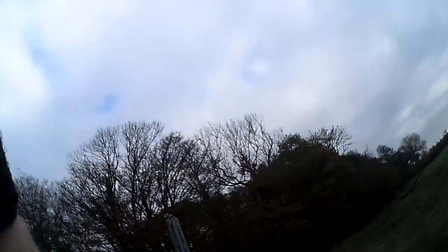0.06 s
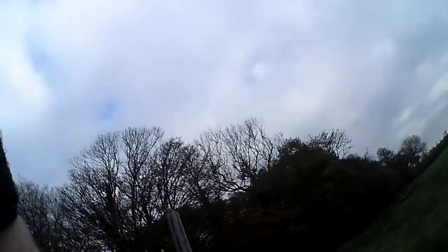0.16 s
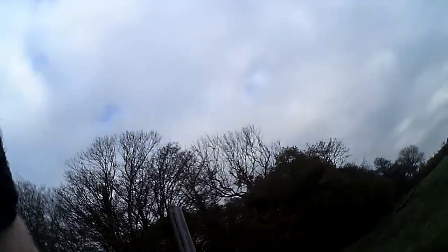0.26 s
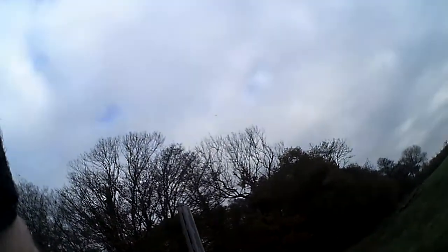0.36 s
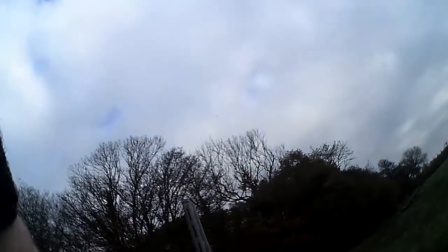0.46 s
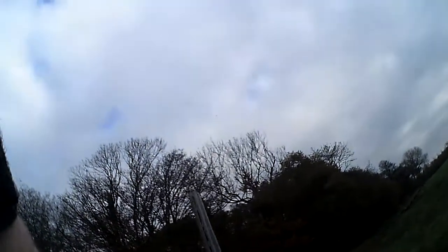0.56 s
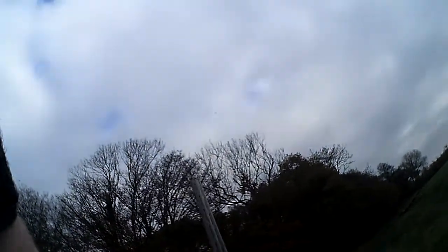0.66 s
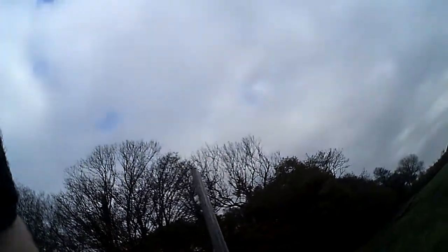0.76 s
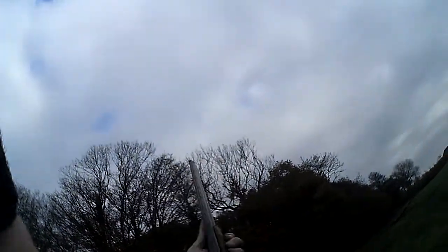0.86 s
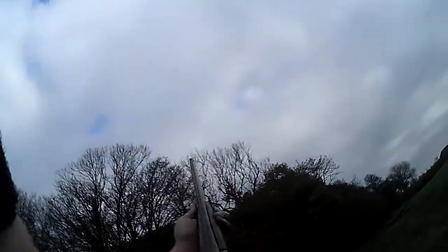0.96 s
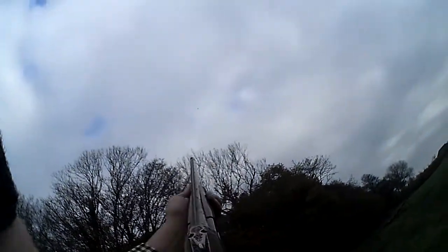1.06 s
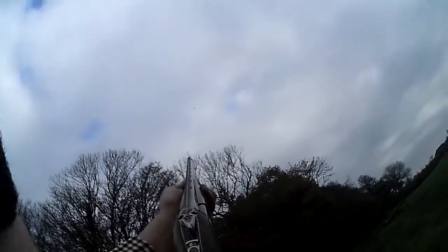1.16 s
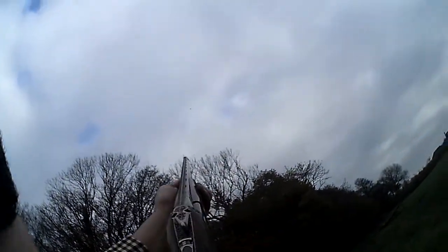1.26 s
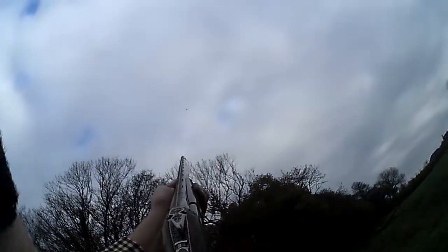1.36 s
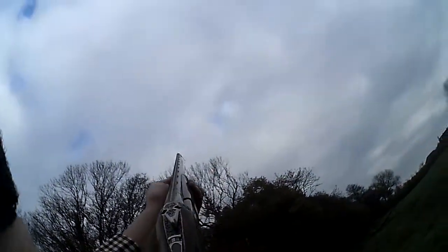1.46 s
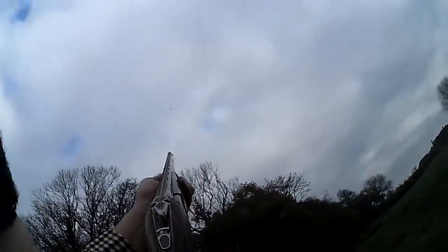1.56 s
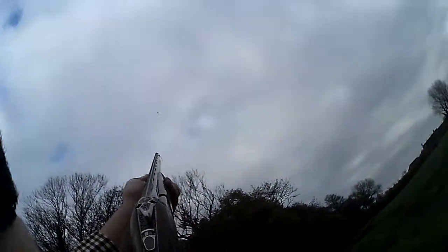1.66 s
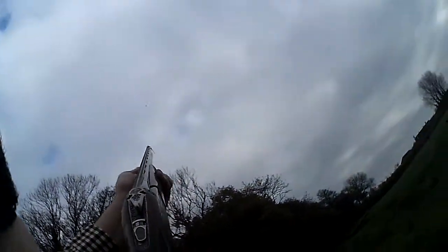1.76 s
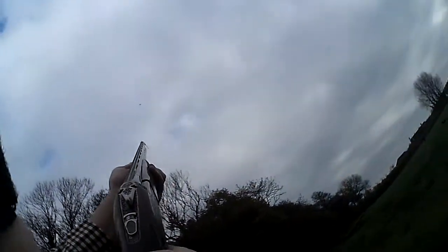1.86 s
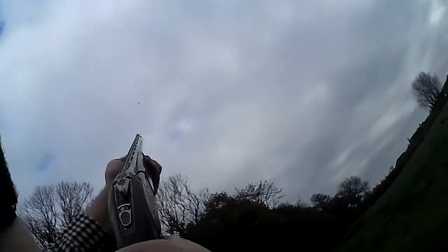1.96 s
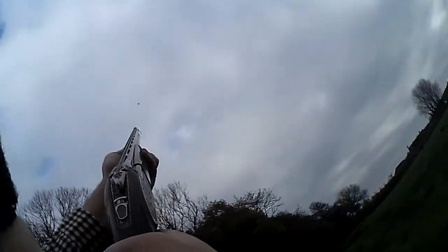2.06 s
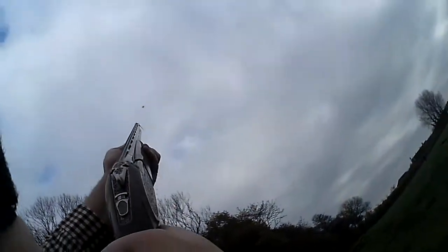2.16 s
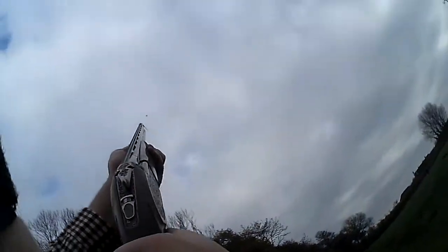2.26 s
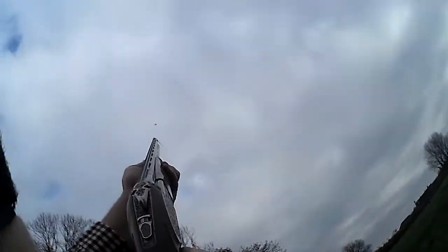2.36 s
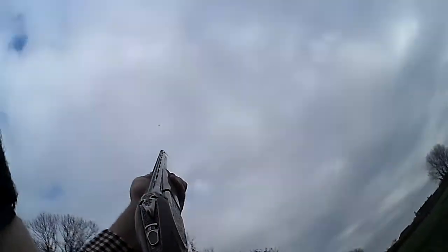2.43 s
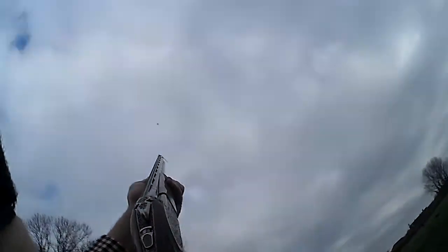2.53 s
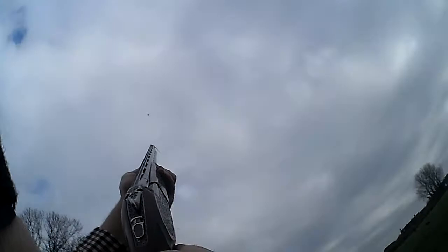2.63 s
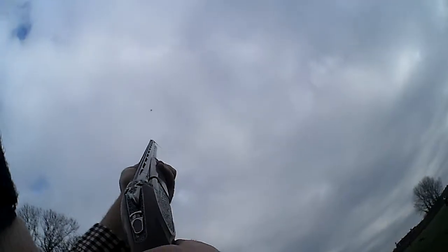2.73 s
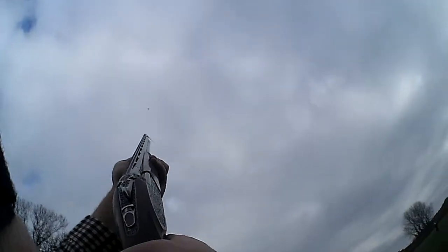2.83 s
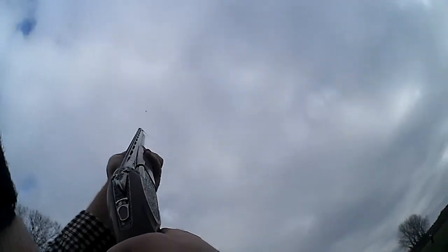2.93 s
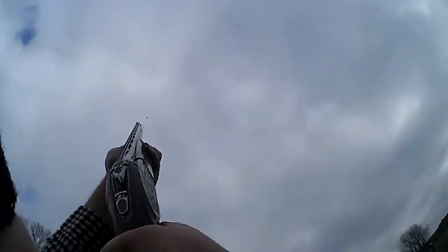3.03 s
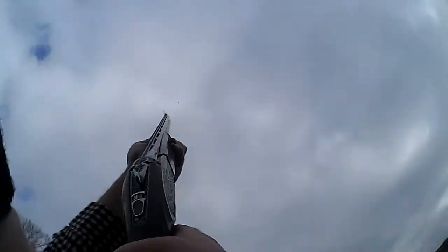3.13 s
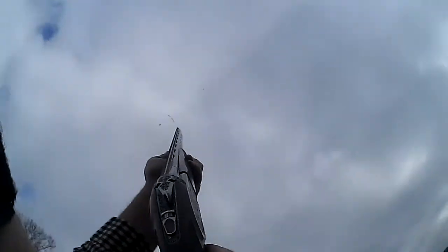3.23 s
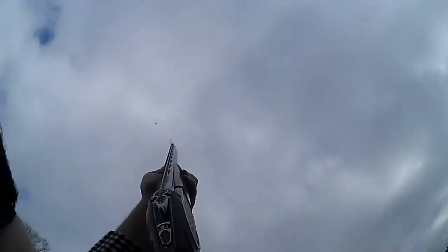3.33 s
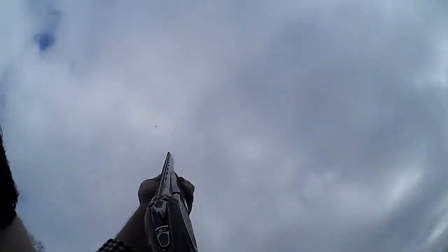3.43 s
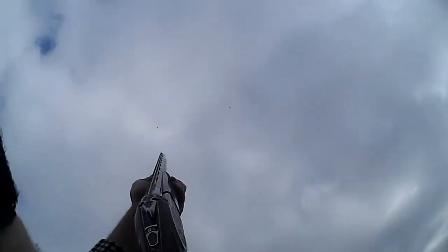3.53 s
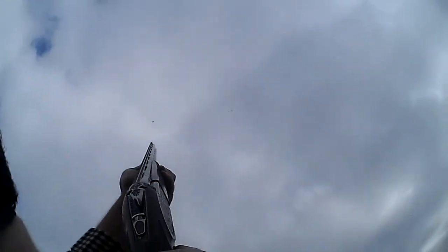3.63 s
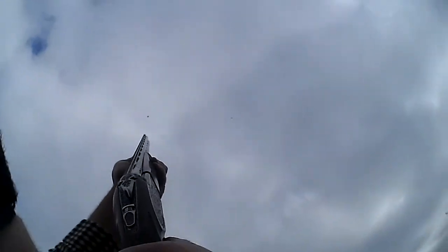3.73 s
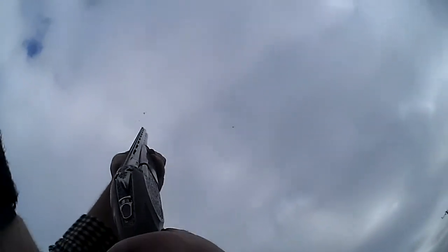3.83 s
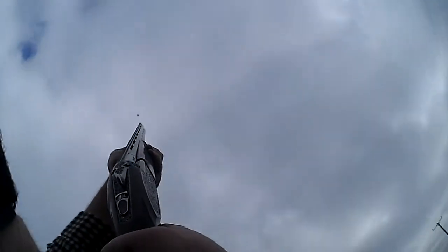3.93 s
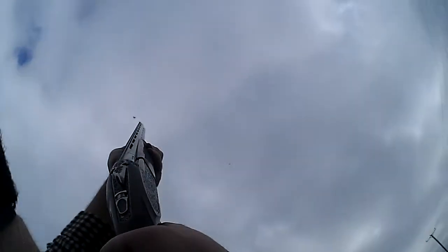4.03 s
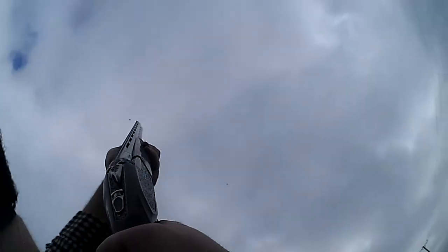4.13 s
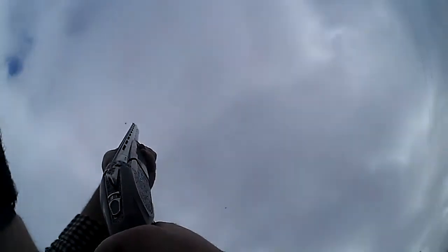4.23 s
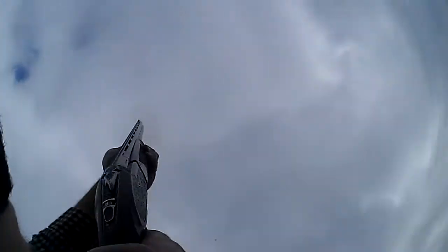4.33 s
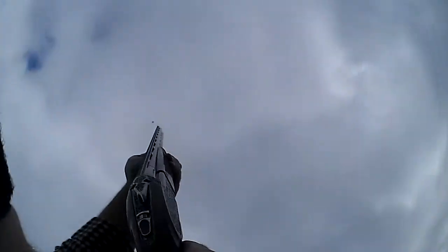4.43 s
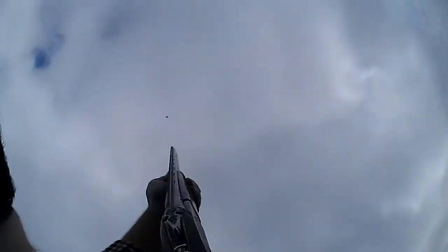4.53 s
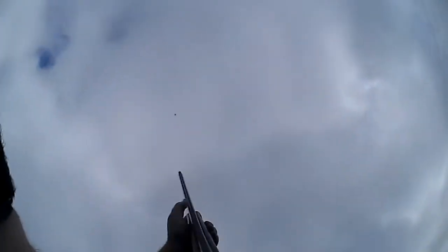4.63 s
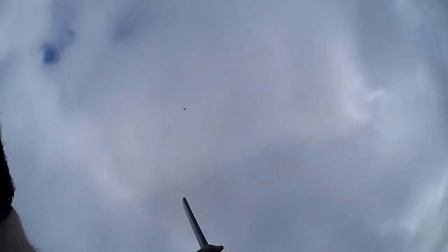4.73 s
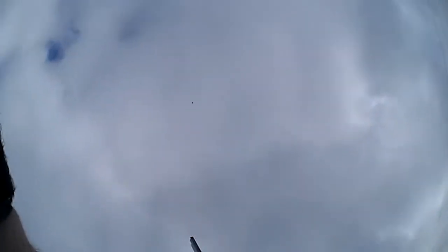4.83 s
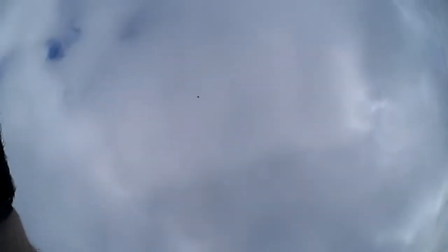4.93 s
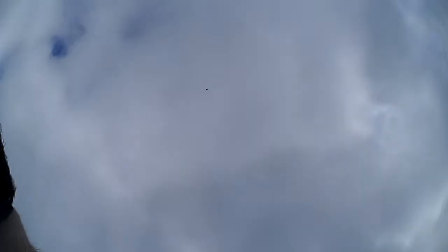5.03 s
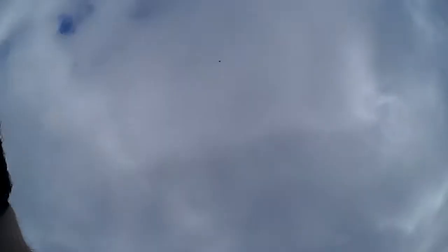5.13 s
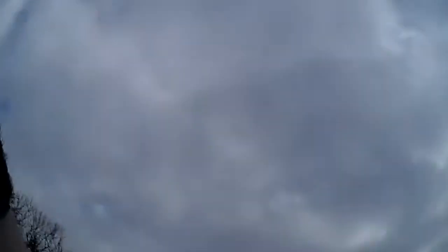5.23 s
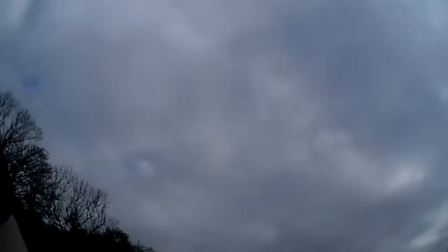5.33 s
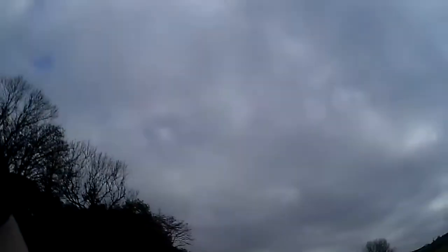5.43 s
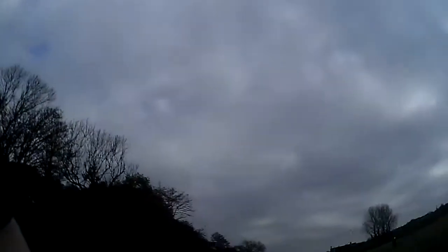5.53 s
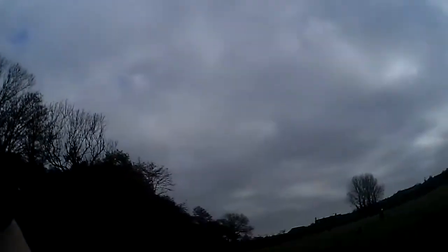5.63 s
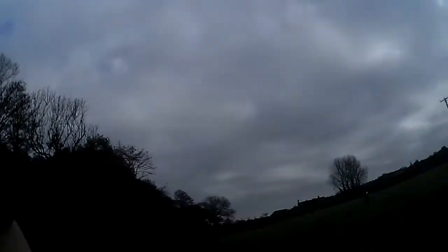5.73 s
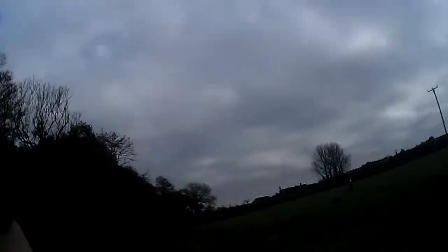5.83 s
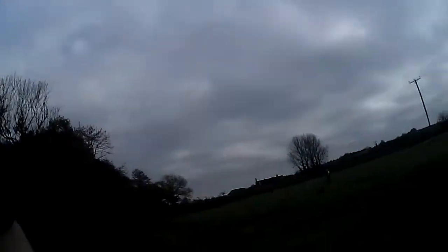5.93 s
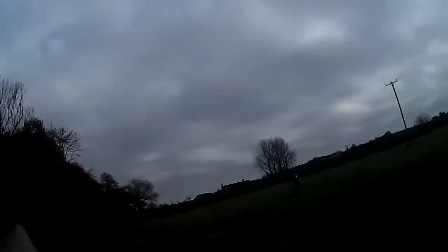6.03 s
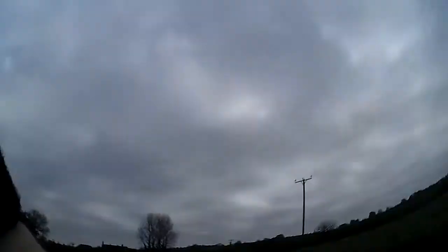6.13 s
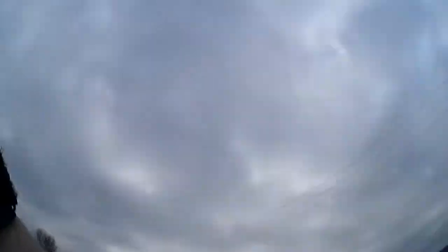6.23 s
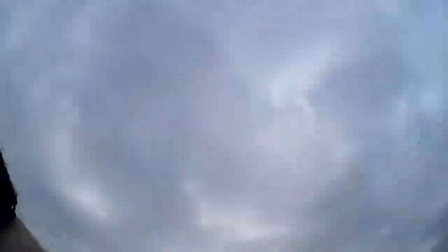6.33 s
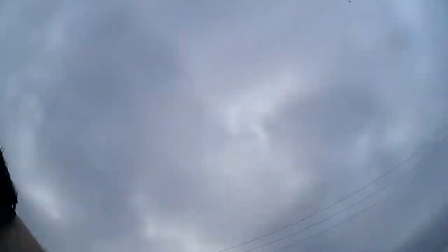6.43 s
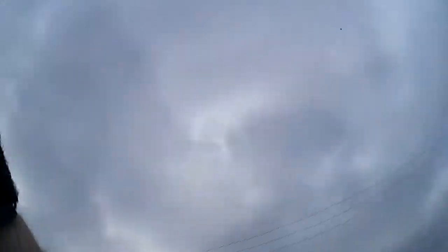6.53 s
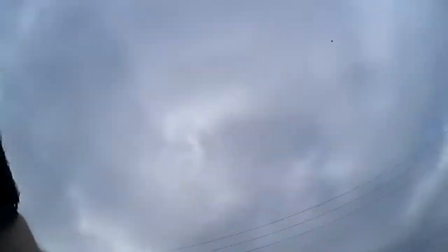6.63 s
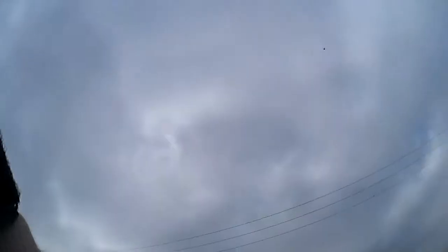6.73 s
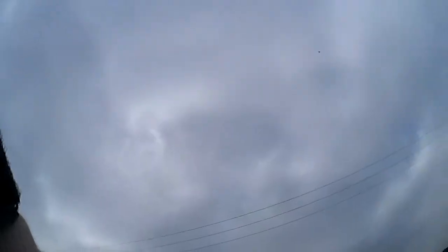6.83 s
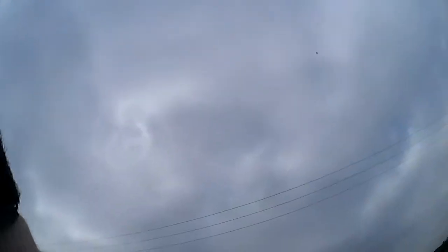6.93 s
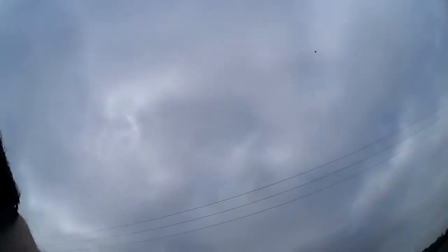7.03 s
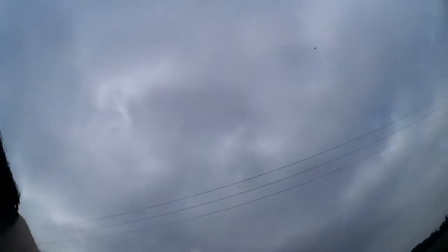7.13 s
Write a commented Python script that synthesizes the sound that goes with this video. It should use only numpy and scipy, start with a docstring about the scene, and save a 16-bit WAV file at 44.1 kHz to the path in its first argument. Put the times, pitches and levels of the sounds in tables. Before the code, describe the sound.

Four shotgun shots in an open field, two from a nearby gun then two louder close ones, echoing off trees, ending with small metallic clicks.

```python
"""A field beside a wood, heard through a camera's cased microphone worn by one of two shooters.
A neighbouring gun fires twice, then the wearer's own gun twice: shock fronts, gas noise and ground bounces.
Scattered taps throw each report back from the trees, and single reflectors add thin copies.
The case rings and the microphone overloads. Banded noise and steel modes click just after each of the
wearer's shots and again later, as the gun is opened; soft rustles of clothing and steady hiss lie beneath."""
import sys
import numpy as np
from scipy import signal
from scipy.fft import rfft, irfft
from scipy.io import wavfile
from scipy.ndimage import uniform_filter1d

SR = 44100
rng = np.random.default_rng(int(sys.argv[2]) if len(sys.argv) > 2 else 0)


def store_pcm(level_fs):
    """Save levels as 16-bit WAV."""
    pcm = np.round(np.clip(level_fs, -1, 1) * 32767).astype(np.int16)
    wavfile.write(sys.argv[1], SR, np.atleast_2d(pcm).T)


N = 316544


def own_gun(blast_ms=0.058, front_hz=5000, jolt_db=7, jolt_ms=0.57, lock_db=-9, lock_t60=0.062, lock_hz=4500,
            gas_db=-18, gas_s=.005, gas_hz=11000, push_db=0, push_hz=178, push_t60=.055,
            bounce_db=15.5, bounce_ms=0.19, grass_hz=3200, spread_db=-12, spread_t60=0.011, clatter_db=0,
            far_ms=.18, twig_db=-43, woods_delay=0.078, woods_t60=1.15, reflectors_db=-4):
    """Hammer and ignition jolt the gun; the muzzle blast follows, then its bounce off the ground and the recoil."""
    # the wearer's shots: start_s (muzzle blast), blast_db, echo_db
    shots = [(3.0550, 29, 4), (4.2514, 26, 1.5)]
    # trunks, hedges and far buildings around this spot:
    # delay_s, size_db (before path loss), depth_t60_s, blast_length_ms
    reflectors = [(.128, 4.5, 0.051, 0.67), (.205, 1.5, 0.032, 0.75), (.371, -1, .04, 0.69),
                  (.471, -3.5, 0.034, 0.32), (.813, 3.5, 0.019, 0.37), (.876, 6, .9, .25)]
    # clatter of recoil and nearby ground: frequency_hz, level_db
    clatter_colour = [(25, 3.5), (70, -10.5), (200, -4), (360, 5.5), (650, -2.5), (1200, 2.5), (1900, -2.5),
                      (2700, 0), (4000, -6.5), (8000, -4.5), (11500, -3), (15000, -7.5)]
    # how long each band of the clatter lasts: frequency_hz, t60_s
    clatter_t60s = [(30, 0.24), (150, 0.065), (500, 0.15), (2000, 0.11), (6000, 0.13), (12000, 0.056)]
    lock_s = .0056  # from the hammer's fall to the muzzle blast
    ground_s = .01  # from the muzzle blast to its bounce off the ground

    out = np.zeros(N)
    t = np.arange(SR // 4) / SR
    push = np.sin(2 * np.pi * push_hz * t) * decay(t, push_t60)
    for s, db, echo_db in shots:
        add(out, s - lock_s, amp(jolt_db) * dulled(blast(jolt_ms), lock_hz))
        add(out, s - lock_s, amp(lock_db) * dulled(burst(lock_t60), lock_hz))

        add(out, s, amp(db) * dulled(blast(blast_ms), front_hz))
        add(out, s, amp(db + gas_db) * dulled(jet(gas_s), gas_hz))
        add(out, s, amp(push_db) * push)  # the stock thumps the shoulder

        bounce = amp(spread_db) * smeared(burst(spread_t60), bounce_ms)  # rough ground
        add(bounce, 0, blast(bounce_ms))
        add(out, s + ground_s, amp(bounce_db) * dulled(bounce, grass_hz))
        clatter = dying(rng.standard_normal(SR // 2), clatter_colour, clatter_t60s)
        add(out, s + ground_s, amp(clatter_db) * clatter)

        add(out, s, amp(echo_db) * woods(blast(far_ms), woods_delay, woods_t60))
        add(out, s, amp(twig_db) * twigs())
        add(out, s, amp(echo_db + reflectors_db) * single_echoes(reflectors))
    return out


def neighbour_gun(blast_db=15.0, bounce_lag_ms=1.55, bounce_db=3.5, near_db=-27, near_t60=0.19,
                  gas_db=-12, gas_s=0.0046, front_hz=7000, far_ms=.26, far_bounce=.85,
                  twig_db=-56, woods_delay=.07, woods_t60=1.3):
    """The blast and its ground bounce arrive almost together, which hollows both the report and its echo."""
    # the neighbour's shots: start_s, blast_length_ms, echo_db
    shots = [(1.8967, 0.4, 9.5), (2.7446, .18, 7.5)]
    # trunks, hedges and far buildings around that spot:
    # delay_s, size_db (before path loss), depth_t60_s, blast_length_ms
    reflectors = [(.0815, 7.5, 0.077, 0.45), (.101, -5.5, .05, 0.11), (.134, -1, .02, 0.31),
                  (.228, 1.5, .035, 0.51), (.43, -1, .035, .45), (.601, -5.5, 0.035, 0.28)]
    # the wearer's body shades and reinforces a blast from the side: frequency_hz, level_db
    sideways = [(150, 1.5), (400, -4.5), (750, 6.5), (1100, 3.5), (1800, -3), (2500, 0.5), (3200, 6),
                (4300, -5.5), (9000, 0), (15000, -7.5)]

    direct, echo = np.zeros((2, N))
    lag = bounce_lag_ms / 1000
    for s, ms, echo_db in shots:
        front = dulled(blast(ms), front_hz)
        add(direct, s, amp(blast_db) * front)
        add(direct, s + lag, amp(blast_db + bounce_db) * front)
        add(direct, s + lag, amp(gas_db) * jet(gas_s))
        add(echo, s, amp(near_db) * smeared(burst(near_t60), ms))  # grass nearby

        report = blast(far_ms)
        add(report, lag, far_bounce * blast(far_ms))
        report = report / (1 + far_bounce)
        add(echo, s, amp(echo_db) * woods(report, woods_delay, woods_t60))
        add(echo, s, amp(echo_db + twig_db) * twigs())
        add(echo, s, single_echoes(reflectors))
    return coloured(direct, sideways) + echo


def blast(ms, size=1024):
    """A shock front, then suction; the impulse is the same for every length."""
    u = np.arange(size) * 1000 / SR / ms
    return np.diff(u * np.exp(-u), prepend=0) * SR / 4000


def jet(length_s, low_hz=160, size=2048):
    """Turbulent gas roars evenly while the barrel empties, then stops."""
    u = np.arange(size) / SR / length_s
    roar = shaped(rng.standard_normal(size), lambda hz: hz / np.hypot(hz, low_hz))
    return roar * np.exp(-u ** 4)


def woods(report, delay, t60, early_db=-17, rise_s=0.018):
    """Countless twigs and trunks scatter a report; only a little returns before it reaches the tree line."""
    # colour of the echo from the trees: frequency_hz, level_db
    tree_colour = [(60, 1), (200, -1), (340, 5), (600, -2), (1000, -10.5), (1300, 1), (1900, -6.5),
                   (3000, -6.5), (4000, -3.5), (6000, -2), (9000, -9), (15000, -18)]
    # air takes the treble first: frequency_hz, t60_factor
    air_loss = [(100, 0.72), (500, 1.183), (2000, 0.87), (4000, 0.44), (9000, 0.37)]
    t = np.arange(2 * SR) / SR
    lumps = unit(uniform_filter1d(rng.standard_normal(len(t)), size=600))
    clumps = amp(2.3 * np.clip(lumps, -2.5, 1.5))  # trees stand in groups
    trunks = amp(2.5 * np.minimum(rng.exponential(1, len(t)), 6))  # a few reflectors are large
    reach = amp(early_db) + (1 + np.tanh((t - delay) / rise_s)) / 2
    taps = rng.choice([-1, 1], len(t)) * trunks * clumps * reach
    taps /= np.linalg.norm(taps * decay(t, t60))  # sets the energy the taps have once they decay
    return signal.fftconvolve(dying(taps, tree_colour, air_loss, t60), report)


def twigs(peak_s=0.13, spread=0.45, centre_hz=4500, octaves=0.5):
    """Bare twigs return only the treble of a blast, as a hiss that swells and fades."""
    t = np.arange(1, SR + 1) / SR
    swell = np.exp(-(np.log(t / peak_s) / spread) ** 2 / 2)
    return band_noise(SR, centre_hz, octaves) * swell


def single_echoes(reflectors, smear_db=-18, low_hz=150, high_hz=2400, path_loss_db_per_s=34.5):
    """Large reflectors return dull, thin blasts: fainter with travel time, smeared longer the deeper they are."""
    out = np.zeros(2 * SR)
    for delay, size_db, depth_t60, ms in reflectors:
        face = amp(smear_db) * burst(depth_t60)
        face[0] += 1  # the clean copy ahead of the smear
        db = size_db - path_loss_db_per_s * delay
        add(out, delay, amp(db) * np.convolve(face / np.linalg.norm(face), blast(ms)))
    return shaped(out, lambda hz: hz / np.hypot(hz, low_hz) / (1 + (hz / high_hz) ** 4))


def action():
    """Steel parts scrape and snap home, and ring briefly."""
    # clicks of the gun's action: start_s, level_db, t60_s, centre_hz, width_octaves, ring_db
    clicks = [(3.0895, -10.5, 0.0056, 11970, 0.42, -53.5), (4.322, -16.5, 0.033, 6530, 1.3, -60),
              (5.0598, -41.5, .012, 1900, .4, -67.5), (5.5227, -34.5, 0.017, 1900, 0.68, -60),
              (5.548, -42, 0.03, 1690, .8, -67), (5.5515, -23.5, 0.04, 3600, 1.7, -47),
              (5.556, -31, 0.0097, 2800, .9, -40)]
    # ringing modes of the action: frequency_hz, level_db (before ring_db), t60_s
    steel = [(338, -2, 0.11), (2000, 0.5, 0.027), (2400, 2, .07), (3970, -3, 0.077), (8773, -5, 0.018),
             (11300, -8, .06)]
    out = np.zeros(N)
    t = np.arange(SR // 4) / SR
    ring = sum(amp(db) * decay(t, t60) * np.sin(2 * np.pi * hz * t) for hz, db, t60 in steel)
    for s, db, t60, centre_hz, octaves, ring_db in clicks:
        snap = band_noise(len(t), centre_hz, octaves) * decay(t, t60)
        add(out, s, amp(db) * snap + amp(ring_db) * ring)
    return out


def rustle(flutter_db=4):
    """Clothing rustles softly and unevenly as the gun is raised and swung."""
    # soft rustles: centre_s, level_db, length_s, centre_hz, width_octaves
    rustles = [(0.111, -58, 0.08, 198, 0.64), (0.258, -66.5, 0.18, 230, 0.78), (1.666, -75, .14, 1540, .25)]
    out = np.zeros(N)
    t = np.arange(N) / SR
    folds = np.clip(unit(uniform_filter1d(rng.standard_normal(N), size=1800)), -2, 2)
    for s, db, length, centre_hz, octaves in rustles:
        swell = np.exp(-(2 * (t - s) / length) ** 2)
        out += amp(db + flutter_db * folds) * band_noise(N, centre_hz, octaves) * swell
    return out


def background(hiss_db=-60.5):
    """Steady hiss and rumble: noise shaped by a fixed spectrum."""
    # spectrum of the steady background: frequency_hz, relative_level_db
    hiss = [(12, -27), (20, 2), (38, -1.5), (85, -8.5), (181, -14), (345, -17.5), (386, -17), (419, -17),
            (1020, -22.5), (1390, -23), (2800, -25.5), (5320, -28), (13400, -28.5), (15800, -30)]
    noise = shaped(rng.standard_normal(N), lambda hz: amp(read(hiss, hz)))
    return amp(hiss_db) * unit(noise)


def amp(db):
    """Decibels to gain."""
    return 10 ** (np.asarray(db) / 20)


def unit(x):
    """Scales to rms 1."""
    return x / np.sqrt(np.mean(x ** 2) + 1e-20)


def decay(t, t60):
    """An exponential that falls 60 dB in t60 seconds."""
    return np.exp(-np.log(1000) * t / t60)


def read(points, hz):
    """Reads a table on a log-frequency axis."""
    f, value = np.transpose(points)
    return np.interp(np.log(hz + 1), np.log(f + 1), value)


def add(mix, s, sound):
    """Mixes a sound in at time s."""
    part = mix[max(round(s * SR), 0):][:len(sound)]
    part += sound[:len(part)]


def shaped(x, gain):
    """Filters by a gain given as a function of frequency."""
    return irfft(rfft(x) * gain(np.fft.rfftfreq(len(x), 1 / SR)), len(x))


def dulled(x, hz):
    """Takes the treble off a sound and rounds its front."""
    return signal.sosfilt(signal.butter(2, min(hz, .45 * SR), fs=SR, output="sos"), x)


def dying(x, colour, t60s, stretch=1):
    """Colours a sound and lets each band die at its own speed."""
    hz, t, z = signal.stft(x, SR, nperseg=256)
    db = read(colour, hz)[:, None] - 60 * t / (stretch * read(t60s, hz)[:, None])
    return signal.istft(z * amp(db), SR, nperseg=256)[1][:len(x)]


def burst(t60, size=16384):
    """A puff of noise that starts at once and dies away."""
    return rng.standard_normal(size) * decay(np.arange(size) / SR, t60)


def smeared(scatter, ms):
    """Scattering spreads a blast of unit energy over many small arrivals."""
    return np.convolve(scatter, blast(ms)) / np.linalg.norm(blast(ms))


def band_noise(size, centre_hz, octaves):
    """Noise of rms 1 in a bell-shaped band."""
    def bell(hz):
        return np.exp(-(np.log2((hz + 1) / centre_hz) / octaves) ** 2 / 2)
    return unit(shaped(rng.standard_normal(size), bell))


def coloured(x, response, size=4096):
    """A causal filter: each peak of the response rings after a pressure jump."""
    log_gain = np.log(amp(read(response, abs(np.fft.fftfreq(size, 1 / SR)))))
    # minimum phase, from the Hilbert transform of the log gain
    ringing = np.fft.ifft(np.exp(np.conj(signal.hilbert(log_gain)))).real[:size // 2]
    return signal.oaconvolve(x, ringing)[:len(x)]


def scene():
    """Guns and action through the ringing case, over the background and the rustles."""
    # response of the microphone in its case: frequency_hz, level_db
    case = [(40, -14.5), (220, -10.5), (400, -0.5), (580, -1), (750, -11.5), (980, -17), (1550, -12.5),
            (1790, 0.5), (2020, 1.5), (2350, -13), (2950, -22), (3500, -16), (3930, -6.5), (4500, -14),
            (5200, -17.5), (10000, -22)]
    air = neighbour_gun() + own_gun() + action()
    return (coloured(air, case) + background() + rustle())[None]


def record(dry, overload=.71, edge_hz=15900):
    """The microphone overloads: blasts flatten with a narrow knee; then the band limit."""
    flattened = dry / (1 + (dry / overload) ** 8) ** (1 / 8)
    band_limit = signal.firwin(255, edge_hz, window=("kaiser", 9), fs=SR)
    return signal.oaconvolve(flattened, band_limit[None], "same")


dry = scene()
out = record(dry)
store_pcm(out)
```